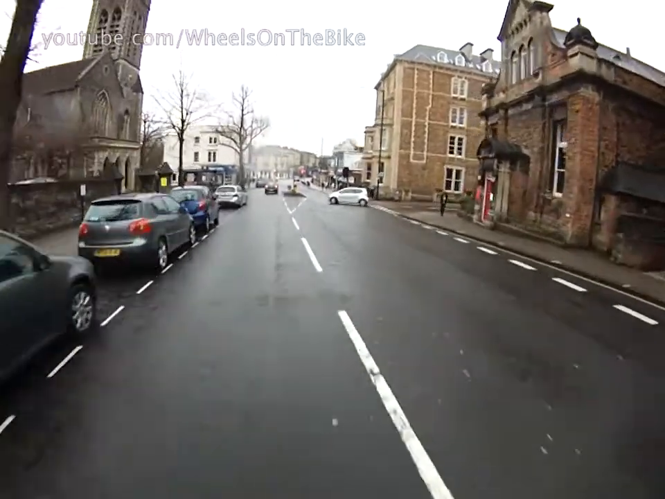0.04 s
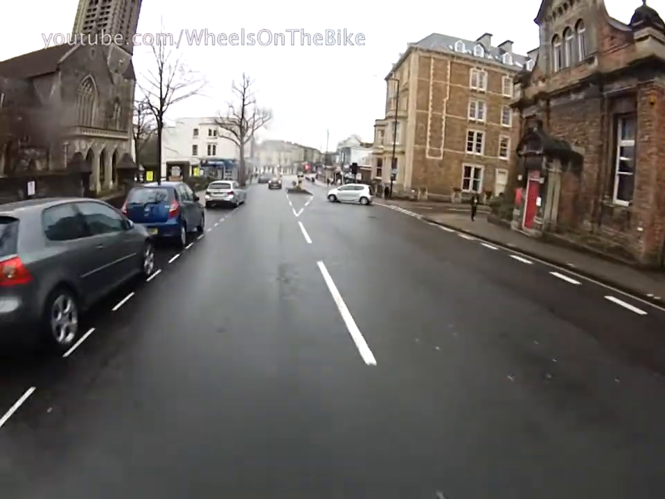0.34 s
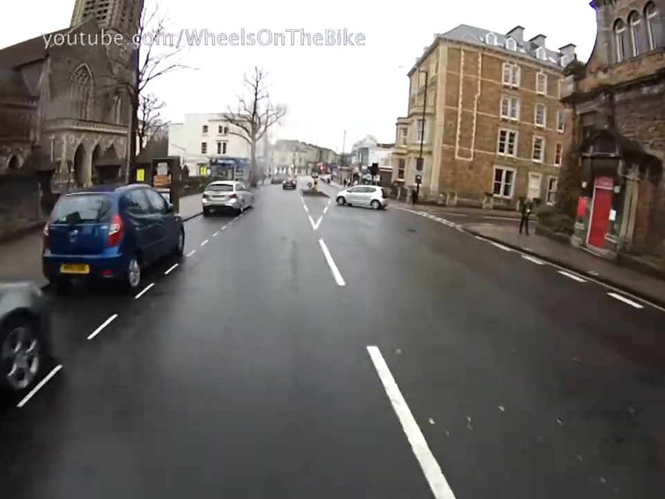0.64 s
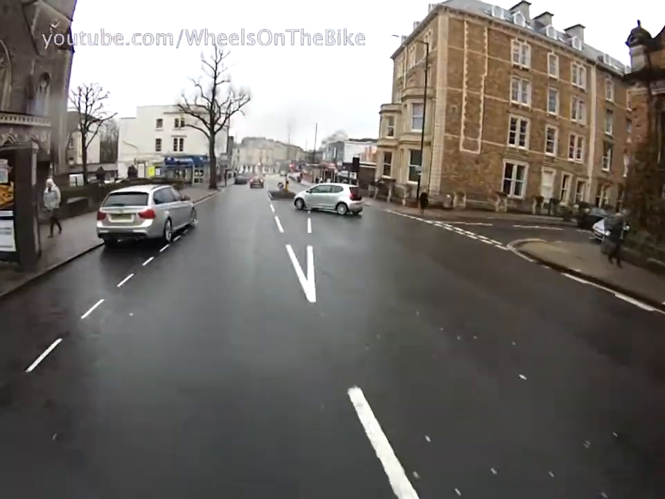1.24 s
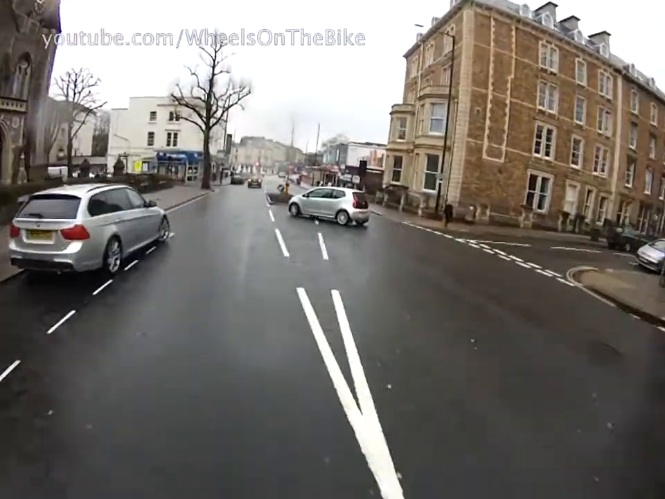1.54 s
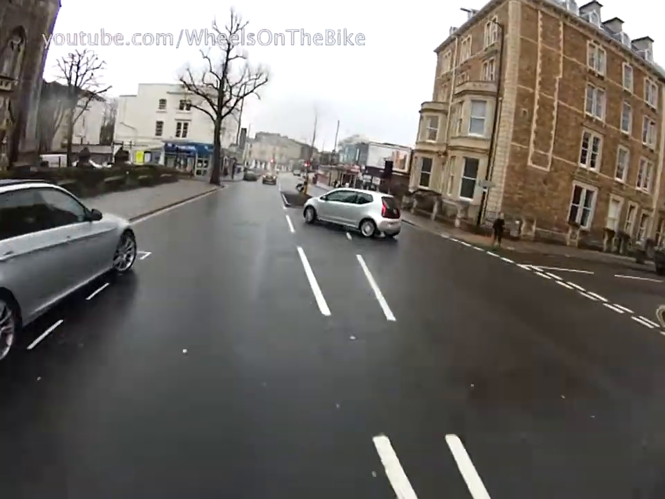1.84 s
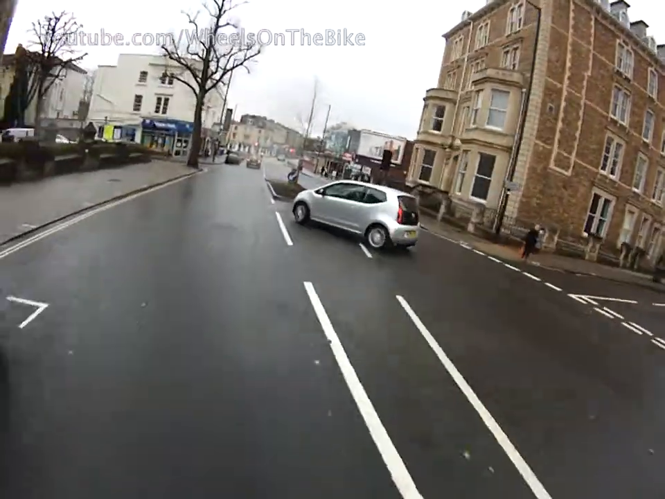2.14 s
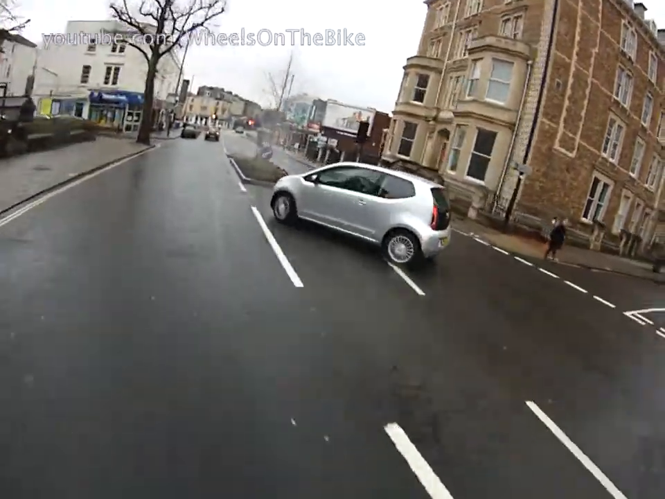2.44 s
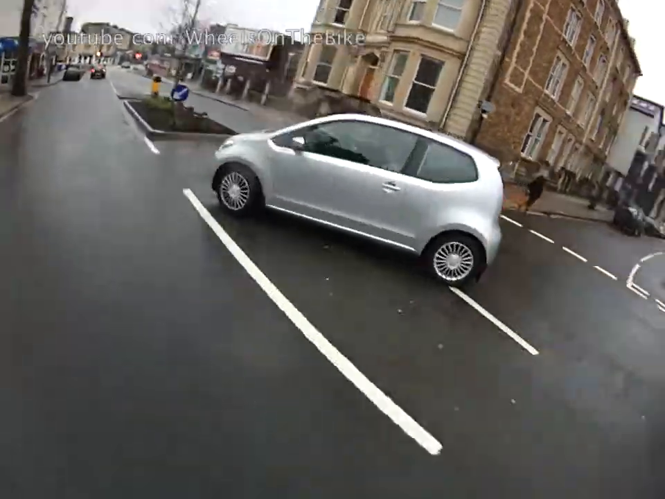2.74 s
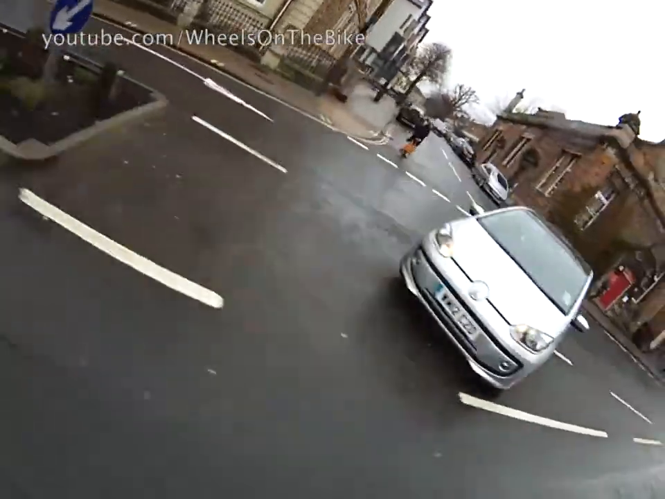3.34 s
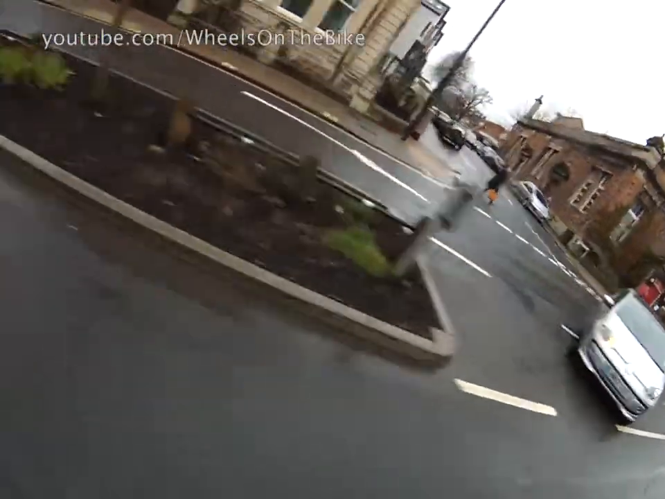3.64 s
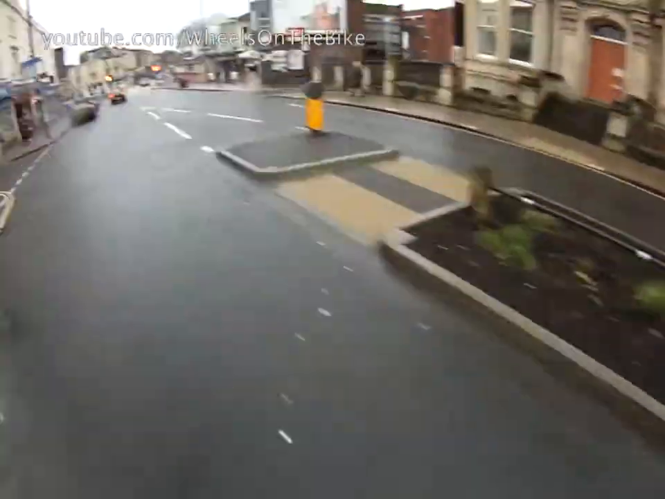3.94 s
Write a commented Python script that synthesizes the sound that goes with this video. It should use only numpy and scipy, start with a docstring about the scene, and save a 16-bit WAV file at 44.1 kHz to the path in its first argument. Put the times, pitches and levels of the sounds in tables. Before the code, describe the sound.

A loud air horn sounds once from a moving bicycle and echoes off the house fronts. Tyres hiss on the wet street and wind rumbles on the rider's microphone, building to crackling gusts near the end.

```python
"""On a wet street, a cyclist gives one long blast on an air horn.
House fronts throw the blast back, raised in pitch by the bicycle's speed, while the recorder's
automatic volume control turns down the tyre hiss. Wind rumbles on the microphone, then buffets
and crackles as the rider swerves round a car."""
import sys
import numpy as np
from scipy import signal
from scipy.fft import rfft, irfft
from scipy.io import wavfile
from scipy.ndimage import uniform_filter1d

SR = 44100
rng = np.random.default_rng(int(sys.argv[2]) if len(sys.argv) > 2 else 0)


def inscribe(sig):
    """Save sig as 16-bit PCM at rate SR to the path in sys.argv[1].

    A 1-D sig is mono; a 2-D sig holds one channel per row.
    Samples are clipped to [-1, 1] before scaling.
    """
    pcm = np.round(np.clip(np.atleast_2d(sig).T, -1, 1) * 32767)
    wavfile.write(sys.argv[1], SR, pcm.astype(np.int16))


N = 176400
T = np.arange(N) / SR
HZ = np.fft.rfftfreq(N, 1 / SR)


def amp(db):
    """Turns decibels into a number to multiply by."""
    return 10 ** (np.asarray(db) / 20)


def unit(x):
    """Scales a signal to an average size (rms) of 1."""
    return x / np.sqrt(np.mean(x ** 2) + 1e-20)


def curve(points):
    """Joins (time_s, value) points by straight lines."""
    return np.interp(T, *np.transpose(points))


def colour(x, points):
    """Makes each pitch louder or softer, following (pitch_hz, level_db) points."""
    hz, db = np.transpose(points)
    return irfft(rfft(x) * amp(np.interp(np.log(HZ + 1), np.log(hz + 1), db)), N)


def noise(points, low_hz, high_hz):
    """Coloured noise whose part between the two pitches has an average size of 1."""
    x = colour(rng.standard_normal(N), points)
    band = (HZ > low_hz) & (HZ < high_hz)
    return x / np.std(irfft(rfft(x) * band, N))


def wander(hz):
    """A random wobble of average size 1, no faster than about hz."""
    return unit(irfft(rfft(rng.standard_normal(N)) * (HZ > 0) / (1 + (HZ / hz) ** 4), N))


# How loud the tyres and traffic are: time_s, level_db
TYRE_LEVEL = [(0, -42), (.1, -44), (.15, -40.5), (.43, -46.5), (.62, -43.5), (1.95, -41), (2.3, -41.5),
              (2.68, -43.5), (2.77, -52), (2.88, -46), (3.05, -51.5), (3.6, -59.5), (3.8, -63), (3.93, -64),
              (4, -65.5)]
# Their tone: pitch_hz, level_db
TYRE_TONE = [(60, -34), (100, -19), (240, -3), (430, -0.5), (700, -5), (900, -8.5), (1400, -10.5),
             (2200, -10), (2550, -13.5), (3000, -23.5), (3700, -25.5), (4900, -28), (5600, -35),
             (7500, -38), (9500, -42.5), (11500, -49.5), (15000, -55)]


def tyre_hiss():
    """Tyres hiss on the wet road."""
    return noise(TYRE_TONE, 1500, 3000) * amp(curve(TYRE_LEVEL) - 0.5 + 0.97 * wander(25))


# How loud the wind's rumble is: time_s, level_db
RUMBLE_LEVEL = [(0, -39), (.1, -36.5), (.33, -37.5), (.5, -41.5), (.63, -36.5), (.8, -38.5), (1.15, -38.5),
                (1.5, -41), (1.85, -45), (2, -41.5), (2.25, -45), (2.42, -33), (2.73, -33), (2.78, -42),
                (3, -37), (3.35, -33.5), (3.58, -39.5), (3.75, -40), (3.82, -45), (4, -58)]
# Its tone: pitch_hz, level_db
RUMBLE_TONE = [(20, -12), (45, -10), (80, 0), (150, -0.5), (250, -1.5), (450, -15), (900, -44), (2000, -36),
               (8000, -75)]


def wind_rumble():
    """Swirls of air make a deep rumble on the microphone."""
    return noise(RUMBLE_TONE, 40, 200) * amp(curve(RUMBLE_LEVEL) - 2 + 0.75 * wander(25))


# How loud the wind's buffeting is: time_s, level_db
BUFFET_LEVEL = [(0, -37.5), (.125, -43), (.137, -32), (.3, -36.5), (.45, -42), (.8, -42.5), (1, -35.5),
                (1.6, -48), (2.3, -53.5), (2.58, -33.5), (2.7, -41), (2.78, -45), (2.92, -44.5),
                (2.99, -30.5), (3.14, -28.5), (3.2, -24.5), (3.26, -29), (3.31, -24.5), (3.34, -28),
                (3.375, -17.5), (3.41, -21), (3.45, -24), (3.549, -30), (3.556, -27.5), (3.59, -30.5),
                (3.688, -28), (3.705, -23), (3.73, -22), (3.785, -29), (3.805, -39), (3.86, -39),
                (3.93, -55), (4, -65)]
# Its tone: pitch_hz, level_db
BUFFET_TONE = [(40, -46), (130, -14.5), (190, -2.5), (240, 0.5), (290, 0), (430, -0.5), (580, -4),
               (720, -4), (1300, -12), (2200, -22), (3500, -38), (8000, -63.5), (15000, -69)]
# How loud the wind's crackle is: time_s, level_db
CRACKLE_LEVEL = [(0, -88), (2.6, -93), (2.8, -77), (2.95, -76), (3.1, -81), (3.138, -74), (3.146, -59),
                 (3.2, -61), (3.235, -65), (3.285, -64), (3.3, -58), (3.328, -47), (3.338, -49.5),
                 (3.385, -46.5), (3.42, -51.5), (3.44, -56), (3.465, -53), (3.49, -61.5), (3.52, -54),
                 (3.545, -69), (3.56, -48.5), (3.58, -65), (3.6, -55.5), (3.63, -65), (3.66, -50.5),
                 (3.688, -57), (3.703, -57), (3.73, -47), (3.77, -48), (3.8, -78), (3.9, -95)]
# Its tone: pitch_hz, level_db
CRACKLE_TONE = [(200, -16), (800, -1), (2000, 2), (4000, -8), (8000, -22.5), (10000, -30), (12000, -39),
                (15000, -45)]


def wind_gusts():
    """Gusts beat on the microphone; the strongest tear into crackle."""
    gust_db = 1.36 * wander(60)
    buffet = noise(BUFFET_TONE, 200, 1200) * amp(curve(BUFFET_LEVEL) + 1.5)
    fizz = noise(CRACKLE_TONE, 4500, 12000) * amp(curve(CRACKLE_LEVEL) + 1)
    flicker = unit(amp(5 * np.clip(wander(600), -2, 2)))  # breaks the fizz into crackle
    return (buffet + fizz * flicker) * amp(gust_db)


# Single pops of wind: time_s, level_db
POPS = [(3.111, -23), (3.149, -22), (3.2, -14), (3.208, -17), (3.341, -11), (3.385, -6.5), (3.416, -14),
        (3.565, -17), (3.72, -11.5), (3.754, -7), (3.775, -20)]
# Their tone: pitch_hz, level_db
POP_TONE = [(100, -7), (500, 6), (5000, 0.5), (9000, -1), (15000, -11)]


def wind_pops(fade_s=0.00013):
    """Sharp jumps of air pressure pop inside the gusts."""
    spikes = sum(amp(db) * np.exp(-np.minimum(abs(T - time_s) / fade_s, 50)) for time_s, db in POPS)
    return colour(spikes, POP_TONE)


def street_ring(x, low_fade_s=1.63, treble_fade_s=0.47):
    """Sound lingers between the house fronts, dropping 60 dB in each fade time; the treble dies first."""
    t, bounces = T[:SR], rng.standard_normal(SR)
    low = signal.sosfiltfilt(signal.butter(2, 7000, fs=SR, output="sos"), bounces)
    tail = low * amp(-60 * t / low_fade_s) + (bounces - low) * amp(-60 * t / treble_fade_s)
    return signal.fftconvolve(x, tail / np.linalg.norm(tail))[:N]


BIKE_M_PER_S, SOUND_M_PER_S = 10.3, 343
HALF_STREET_M, BEHIND_M, AHEAD_M = 6.5, 19, 54
# The tone of the echoes: pitch_hz, level_db
ECHO_TONE = [(790, -2.5), (1600, -6), (2400, 2), (3200, -0.5), (4200, 7.5), (5000, 7), (6500, 7.5),
             (8000, 2.5), (9500, 11.5), (15000, 4)]


def street_echoes(blast, count=100, treble_loss_db_per_m=0.18):
    """Walls and parked cars echo: those ahead draw nearer and sound higher, far ones sound dull."""
    treble = signal.sosfilt(signal.butter(1, 4000, "high", fs=SR, output="sos"), blast)
    # Twice as many samples let the delays slide smoothly.
    low, treble = signal.resample_poly(np.array([blast - treble, treble]), 2, 1, axis=1)
    echoes, t = np.zeros(N), T[T < HORN_OFF_S + 1]
    for i, (along, across, slant, flip) in enumerate(rng.random((count, 4))):
        place_m = -BEHIND_M + (AHEAD_M + BEHIND_M) * (i + along) / count
        closing_speed = BIKE_M_PER_S * (1 - .2 * slant ** 2)  # twice-bounced paths close in more slowly
        ahead_m = place_m - closing_speed * (t - HORN_OFF_S)
        distance_m = np.hypot(ahead_m, HALF_STREET_M * (.15 + 1.4 * across))
        dulled = low + amp(-treble_loss_db_per_m * distance_m.mean()) * treble
        sent_s = t - 2 * distance_m / SOUND_M_PER_S
        delayed = np.interp(sent_s * 2 * SR, np.arange(2 * N), dulled)
        aim = (1 + ahead_m / distance_m) ** 0.63  # the horn points ahead
        echoes[:len(t)] += np.sign(flip - .5) * aim * delayed / distance_m
    ringing = unit(echoes + amp(-11.5) * street_ring(echoes))
    return amp(-16) * colour(ringing * np.std(blast), ECHO_TONE)


HORN_ON_S, HORN_OFF_S, RISE_S, FADE_S = .6435, 1.769, .009, .0156
HORN_HZ, HORN_DB = 787.4, -13
# The tones that make up the horn early in the blast: pitch_multiple, level_db
EARLY_TONES = [(1, -3), (2, 1.5), (3, -11.5), (4, -13.5), (5, -19), (6, -21.5), (7, -19.5), (8, -22.5),
               (9, -19.5), (10, -16.5), (11, -21.5), (12, -29.5), (13, -29), (14, -29), (15, -37),
               (16, -37), (17, -32), (18, -35), (19, -38)]
# The same tones at its end: pitch_multiple, level_db
LATE_TONES = [(1, -3), (2, -0.5), (3, -12.5), (4, -14), (5, -13.5), (6, -18), (7, -20), (8, -39),
              (9, -20.5), (10, -18.5), (11, -32), (12, -29.5), (13, -34), (14, -38), (15, -43), (16, -37),
              (17, -48), (18, -39), (19, -45)]
# A narrow quiet gap that glides up through the horn's treble: time_s, pitch_hz
GAP_PATH = [(.65, 4440), (.74, 4370), (.81, 4550), (1.02, 4950), (1.2, 5130), (1.36, 5300), (1.47, 5520),
            (1.57, 5400), (1.62, 6050), (1.77, 6550)]


def air_horn(gap_db=-14, gap_width_hz=260):
    """Air snaps a thin disc into a bright tone, returned as heard on the bike and as sent ahead."""
    age_s, since_off_s = np.maximum(T - HORN_ON_S, 0), np.maximum(T - HORN_OFF_S, 0)
    pressure = np.minimum(age_s / RISE_S, 1) ** 2 * np.exp(-(since_off_s / FADE_S) ** 2)
    sag_hz = 4.6 * np.exp(-age_s / .48)  # the pitch sinks as the air pressure falls
    chirp_hz = 18 * np.exp(-age_s / .006)
    pitch_hz = HORN_HZ + sag_hz + chirp_hz + 1.1 * wander(127)
    phase = 2 * np.pi * np.cumsum(pitch_hz) / SR
    gap_hz = curve(GAP_PATH)
    late_share = np.clip((T - 1.0) / 0.69, 0, 1)
    near, sent = np.zeros((2, N))
    for (multiple, early_db), (_, late_db) in zip(EARLY_TONES, LATE_TONES):
        strength = amp(early_db) * pressure ** (1 + 0.36 * (multiple - 1))  # more pressure, brighter
        lag = .55 * multiple ** 2  # the flared mouth delays each tone differently
        tone = strength * np.cos(multiple * phase - lag)
        dip_db = gap_db * np.exp(-((multiple * pitch_hz - gap_hz) / gap_width_hz) ** 2)
        shimmer_db = 1.64 * min(multiple / 4, 1) ** .5 * wander(20)
        near += tone * amp((late_db - early_db) * late_share + dip_db + shimmer_db)
        sent += tone
    return np.array([near, sent]) / np.std(near[pressure > .5]) * amp(HORN_DB + 0.76 * wander(20))


def scene():
    """Tyres, wind, echoes and horn meet at one microphone."""
    near, sent = air_horn()
    return (tyre_hiss() + wind_rumble() + wind_gusts() + wind_pops() + street_echoes(sent) + near)[None]


# Moments when a gust chokes the microphone: time_s, length_s, level_db
CHOKES = [(0.368, 0.0046, -25), (3.185, 0.0022, -17), (3.324, 0.011, -16)]


def microphone_chokes(x):
    """A gust overwhelms the microphone and the sound dips for an instant."""
    dips_db = sum(db * np.exp(-np.minimum(abs(2 * (T - time_s) / length_s), 3) ** 4)
                  for time_s, length_s, db in CHOKES)
    return x * amp(dips_db)


def volume_control(x, limit_db=-23, recover_db_per_s=48.5, settle_s=.07):
    """The recorder turns everything down when the sound is loud, then lets it creep back up."""
    # It hardly reacts to the wind's bass.
    sensed = signal.sosfilt(signal.butter(2, 557, "high", fs=SR, output="sos"), x)
    level_db = 10 * np.log10(abs(uniform_filter1d(sensed ** 2, size=330)) + 1e-12)
    recovery_db = T * recover_db_per_s
    held_db = np.maximum.accumulate(level_db + recovery_db) - recovery_db
    over_db = np.maximum(held_db - limit_db, 0)
    quick_db = uniform_filter1d(over_db, size=130)
    # Part of the cut settles slowly, so the blast starts louder.
    carry = np.exp(-1 / (settle_s * SR))
    slow_db = signal.lfilter([1 - carry], [1, -carry], over_db)
    return x * amp(-0.81 * (0.78 * quick_db + 0.22 * slow_db))


def record(dry, top_hz=15300):
    """The microphone chokes, the volume control reacts, and the highest treble is cut off."""
    x = volume_control(microphone_chokes(dry[0]))
    treble_cut = signal.firwin(511, top_hz, window=("kaiser", 9), fs=SR)
    return signal.oaconvolve(x, treble_cut, "same")[None]


dry = scene()
out = record(dry)
inscribe(out)
```